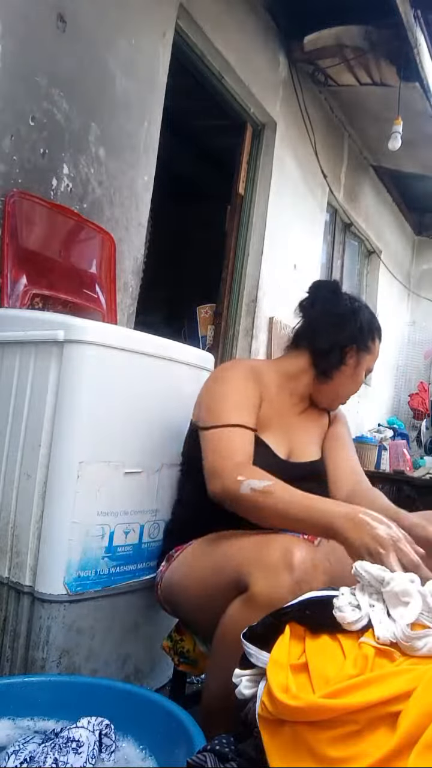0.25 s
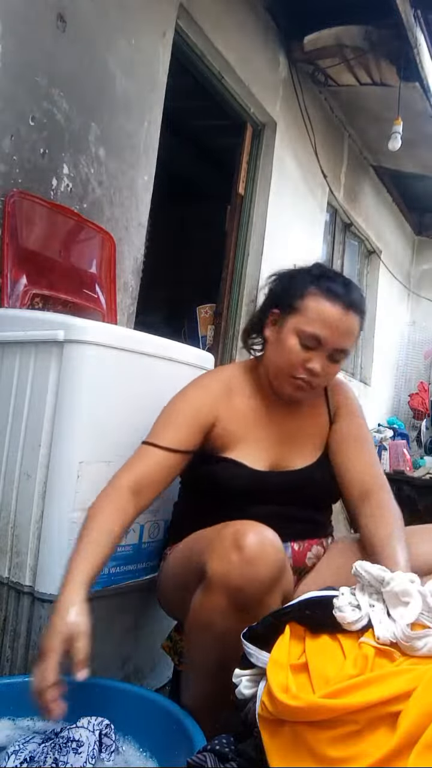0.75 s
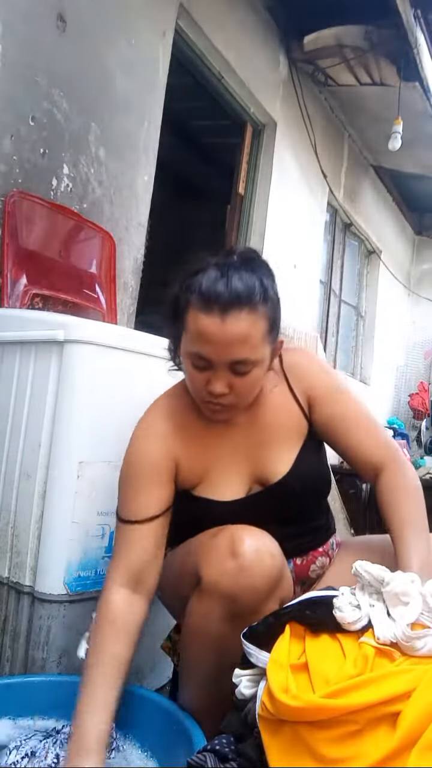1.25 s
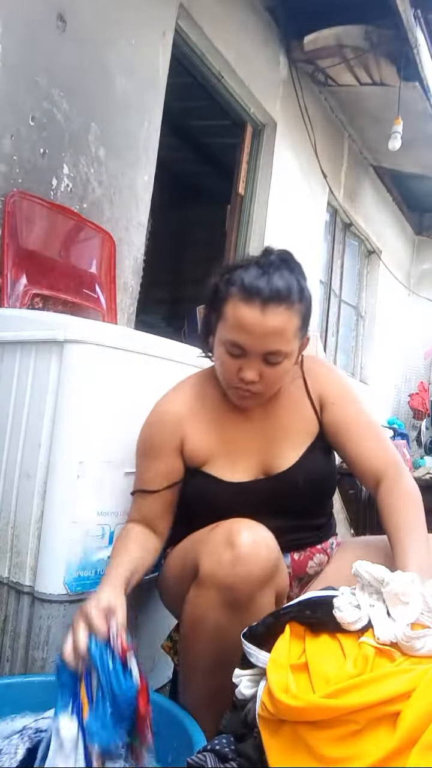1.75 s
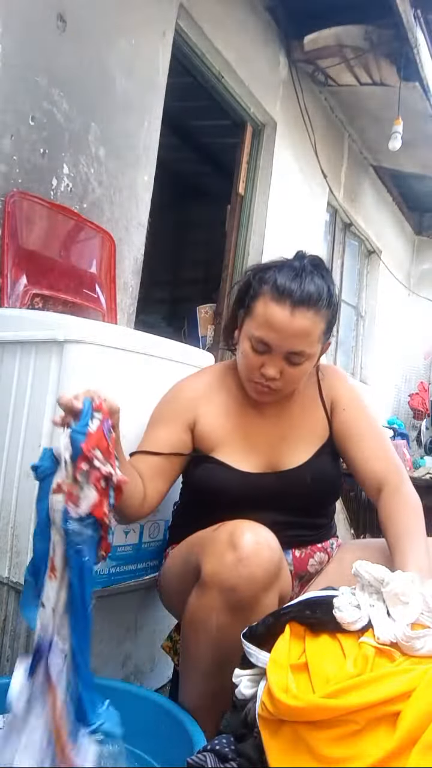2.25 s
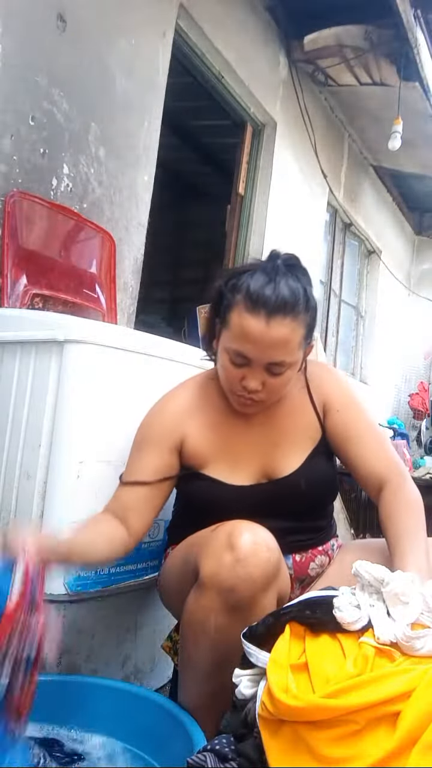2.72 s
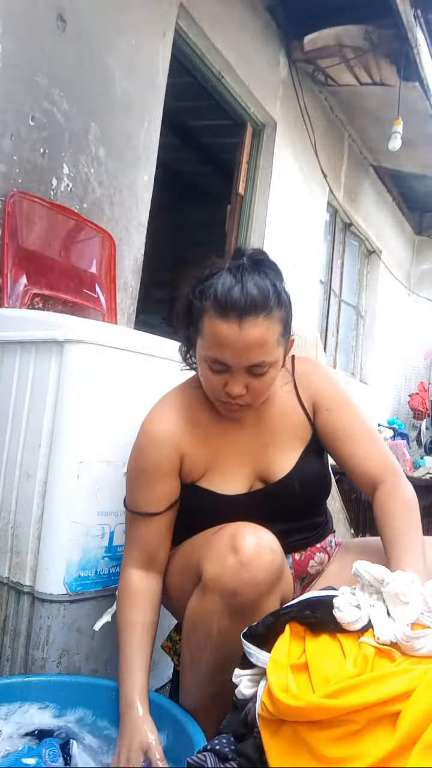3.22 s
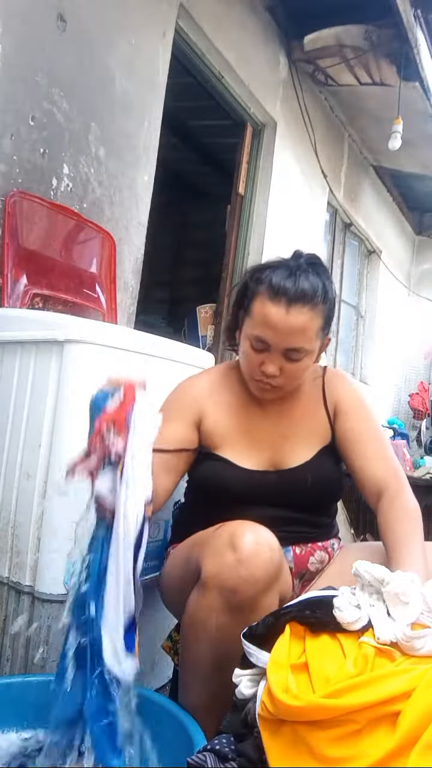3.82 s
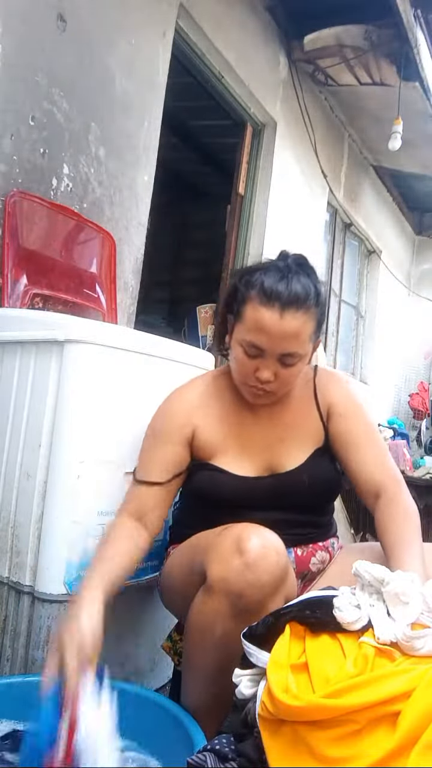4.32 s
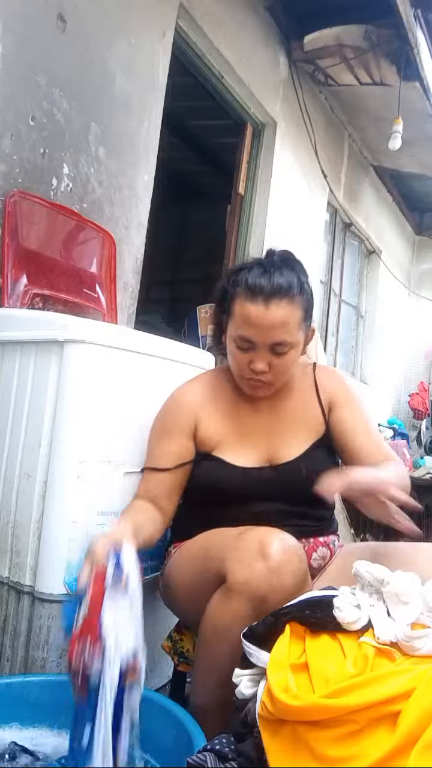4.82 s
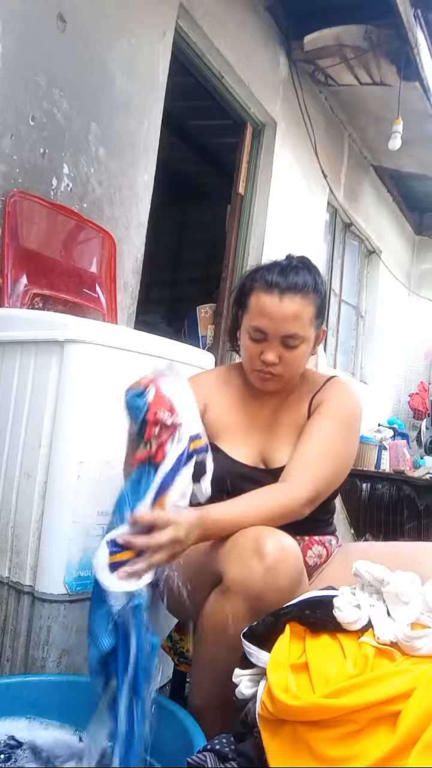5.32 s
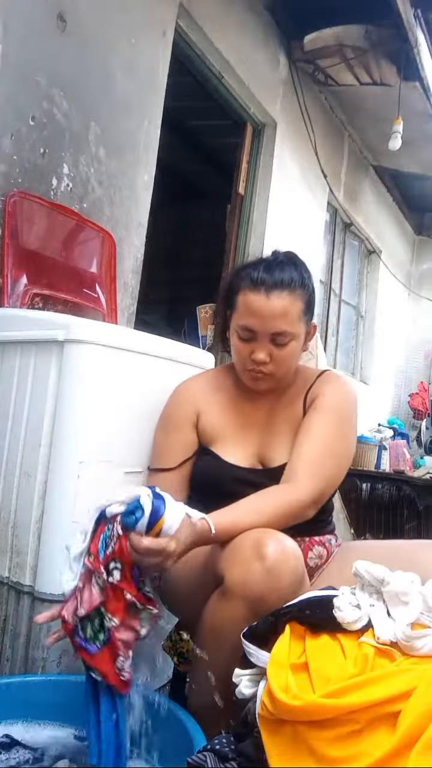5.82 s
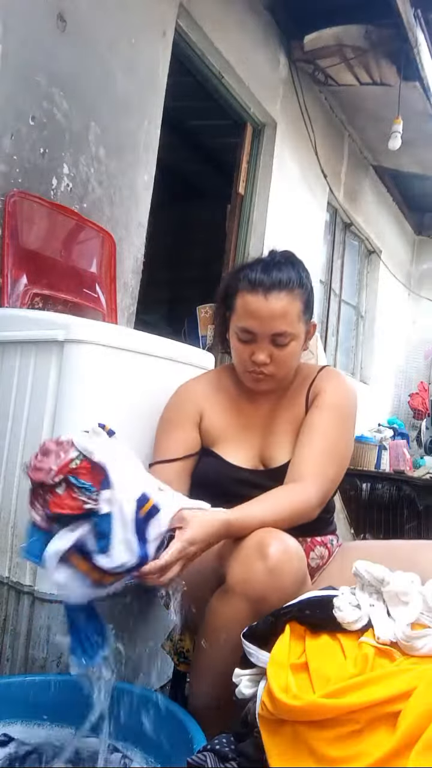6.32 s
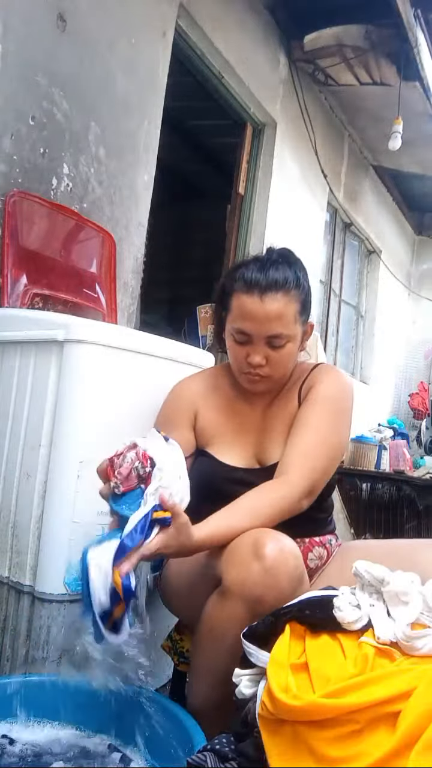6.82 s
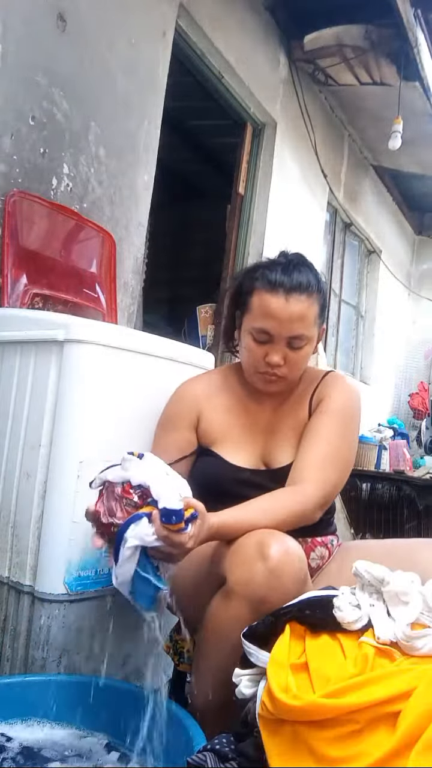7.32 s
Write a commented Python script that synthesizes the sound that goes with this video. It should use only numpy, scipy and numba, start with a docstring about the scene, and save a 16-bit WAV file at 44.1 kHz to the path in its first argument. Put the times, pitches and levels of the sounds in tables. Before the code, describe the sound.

A small yard by a house wall, heard close, with quiet low air and short reflections. At 0-0.4 s small drips and a wet, slapping flop of tossed cloth. Near-quiet follows, with a faint distant hollow drone and thin bird peeps until about 1.2 s, when a hand enters the water with a small plop. From 1.6 s soaked cloth rises, streaming and gurgling with round bubbles; splashes at 2.2 s and heavy dunking from 2.6 to 2.95 s. Around 3.0 s a dull basin knock, and a washing machine's low, steady hum begins and continues to the end. Water quietens, then a second lift from 3.4 s and brighter, forceful splashes at 4.15-4.4 s. A brief lull, then a strong hollow plastic thump at 4.7 s. From 5 s the cloth is gathered and squeezed, with uneven spurts, fizz and pattering run-off; fuller wringing showers and bubbly plops from 6.9 to 7.5 s.

```python
"""Hand washing in a plastic basin

Clothes are washed in a small yard beside a house wall: a wet garment is tossed aside, the next lifted, dunked
and wrung. Run-off is showers of decaying sines, splashes are resonant noise bursts, larger bubbles are
single gliding sines, and knocks excite the basin's modes. After three seconds a washing machine starts and
hums on, as sines over resonant noise; a bird peeps faintly in swept sines above the yard's shaped noise."""
import sys
import numpy as np
from scipy import signal
from scipy.fft import rfft, irfft
from scipy.io import wavfile
from scipy.ndimage import uniform_filter1d
from numba import njit

SR = 44100
rng = np.random.default_rng(int(sys.argv[2]) if len(sys.argv) > 2 else 0)


def materialize(psi):
    """Save the field psi as 16-bit PCM at rate SR to the path in sys.argv[1].

    A 1-D psi becomes a single channel; in a 2-D psi each row is a channel.
    """
    bounded = np.clip(np.atleast_2d(psi).T, -1, 1)
    quanta = np.round(bounded * 32767).astype(np.int16)
    wavfile.write(sys.argv[1], SR, quanta)


N = 333396

# successive movements of the cloth: [t/s, water flow level/dB, height/1 from 0 under water to 1 held high]
REACH_IN = [(.67, -95, 0.71), (.8, -84, 0.63), (.89, -77.5, 0.74), (1.08, -94, .6), (1.12, -69, 0.44),
            (1.2, -63, 0.61), (1.29, -57, 0.64), (1.38, -78.5, 0.5), (1.56, -79.5, 0.37)]
FIRST_LIFT = [(1.629, -61.5, 0.37), (1.73, -51.5, 0.34), (1.78, -46.5, 0.25), (2.02, -49.5, .35),
              (2.1, -46.5, 0.65), (2.27, -40.5, 0.43), (2.34, -48.5, 1), (2.5, -57.5, 1)]
FIRST_DUNK = [(2.548, -44, 0.88), (2.65, -40.5, 0.49), (2.72, -52, 0.78), (2.84, -37.5, 0.5),
              (2.93, -45.5, 0.32), (2.99, -66.5, 0.76)]
GRIP = [(3.05, -67.5, 0.33), (3.08, -66, 0.95), (3.17, -55.5, 0.28), (3.22, -67.5, 0.41),
        (3.36, -73.5, 0.13)]
SECOND_LIFT = [(3.44, -59, 0.28), (3.52, -57, 0.24), (3.58, -49.5, 0.1), (3.72, -47, 0.41),
               (3.89, -54.5, 0.46), (3.97, -45.5, 0.66), (4.14, -43, 0.52)]
SECOND_DUNK = [(4.2, -37, 0.46), (4.27, -40.5, 0.41), (4.35, -34, .75), (4.41, -53.5, 0.43),
               (4.5, -82, 0.14), (4.59, -70, 0.077)]
THIRD_LIFT = [(4.657, -63, 0.095), (4.681, -42.5, 0.14), (4.78, -55, .35), (4.86, -58.5, .05),
              (4.99, -57.5, 0.26), (5.09, -49, 0.48), (5.25, -57, 0.77)]
GATHER = [(5.31, -47, 0.52), (5.47, -49.5, 0.46), (5.6, -48, 0.82), (5.78, -45.5, 0.71),
          (5.95, -51.5, 0.71), (6.02, -56, 0.74), (6.22, -63, 1)]
WRING = [(6.26, -55, 1), (6.48, -51, 0.93), (6.65, -49.5, 0.72), (6.86, -58, 0.47), (6.93, -44, 0.54),
         (7.01, -48.5, 0.72), (7.16, -42, 0.57), (7.33, -48, 0.71), (7.56, -47, 0.9)]
# spectral tilt of gentle, duller run-off: [f/Hz, level/dB]
RUN_OFF = [(4500, -2.5), (6200, -2.5), (8300, -4), (11000, -1.5), (15800, -0.5)]
# at half height: level of each layer against the flow, and favoured pitch of the babble
SPRAY_DB, FIZZ_DB, GULP_DB, BABBLE_HZ = 1, -13, -9.5, 1373
# change of each layer, and of the babble's pitch, as the height goes from 0 to 1
SPRAY_LIFT_DB, FIZZ_LIFT_DB, BUBBLE_LIFT_DB, GULP_LIFT_DB, BABBLE_LIFT_OCTAVES = 14.5, 8.5, -14.5, -17, 2.5
# both hands squeeze the cloth from here on, forcing more fizz through the weave
SQUEEZE_S, SQUEEZE_FIZZ_DB = 5.05, 8.5
# above this flow, bubbles crowd each other and merge into patter: dB of trade per dB of flow
CROWDED_DB, CROWDING = -50.5, 0.58
# unevenness of the flow at half height, its change from height 0 to 1, and its rate
GUSH_DB, GUSH_LIFT_DB, GUSH_HZ = 3, 1.5, 20.6


def water():
    """Superposition of bubble and droplet sounds: low cloth traps big bubbles, high cloth rains fine spray."""
    moves = (REACH_IN + FIRST_LIFT + FIRST_DUNK + GRIP + SECOND_LIFT
             + SECOND_DUNK + THIRD_LIFT + GATHER + WRING)
    flow_db, height = curves(moves)
    lift = height - .5
    t = np.arange(N) / SR
    bubble_hz = [(s, BABBLE_HZ * 2 ** (BABBLE_LIFT_OCTAVES * (h - .5))) for s, _, h in moves]

    ticks = cloud(count=40000, low_hz=4700, high_hz=16000, cycles=9, spread_db=2.8, glide=0.)
    foam = cloud(count=13000, low_hz=4700, high_hz=8500, cycles=42, spread_db=3.0, glide=.1)
    fizz = cloud(count=8000, low_hz=2500, high_hz=4900, cycles=36, spread_db=3.2, glide=.15)
    babble = cloud(count=5200, low_hz=650, high_hz=2900, cycles=24, spread_db=3.0, glide=.32,
                   favourite=bubble_hz)
    patter = cloud(count=12000, low_hz=580, high_hz=4340, cycles=11.7, spread_db=3.5, glide=0.072)
    gulps = cloud(count=1400, low_hz=417, high_hz=798, cycles=17.7, spread_db=4.0, glide=0.27)

    droplets = colour(undb(-6.0) * ticks + undb(-4.5) * foam, RUN_OFF)
    spray = undb(SPRAY_DB + SPRAY_LIFT_DB * lift) * droplets
    crowd_db = CROWDING * np.maximum(flow_db - CROWDED_DB, 0)
    mixed = undb(-2.0 - crowd_db) * babble + undb(-8.5 + crowd_db) * patter
    bubbles = undb(BUBBLE_LIFT_DB * lift) * mixed
    fizz_db = FIZZ_DB + FIZZ_LIFT_DB * lift + SQUEEZE_FIZZ_DB * (t > SQUEEZE_S)
    gulp_db = GULP_DB + GULP_LIFT_DB * lift

    out = np.zeros(N)
    for layer in (spray, bubbles, undb(fizz_db) * fizz, undb(gulp_db) * gulps):
        # the water leaves the folds in uneven gushes, separate for each layer
        gush_db = (GUSH_DB + GUSH_LIFT_DB * lift) * wander(GUSH_HZ)
        out += undb(flow_db + gush_db) * layer
    return (t > moves[0][0]) * out


# soaked cloth slaps down:
# [t/s at the crest, rise/s, decay/s, plunge level/dB, plunge f/Hz, spray level/dB, extra mist level/dB]
SLAPS = [(0.261, 0.018, 0.031, -42.5, 1920, -47, -16), (.298, 0.0085, .026, -33, 1800, -43.5, -12),
         (.316, 0.0047, 0.018, -37.5, 2390, -45, -13), (1.288, 0.0085, 0.0061, -55, 690, -51, -4),
         (1.762, 0.014, 0.027, -39, 840, -61, -3), (2.189, 0.015, 0.013, -37.5, 1340, -47.5, -16),
         (2.28, 0.0035, 0.015, -42.5, 540, -38, -23), (2.652, 0.029, 0.02, -34.5, 1190, -34, -4),
         (2.843, 0.017, 0.019, -31, 1240, -37, 8.5), (2.92, 0.0012, .01, -39, 1360, -44, -4),
         (4.162, 0.011, 0.017, -54, 1610, -46.5, 8), (4.198, 0.0044, 0.01, -36, 1890, -32.5, -13),
         (4.303, 0.021, 0.02, -35, 780, -37, 5), (4.344, 0.0041, 0.02, -32.5, 700, -35, -3.5),
         (4.676, 0.0068, 0.039, -39.5, 1210, -55, -9), (7.304, 0.0033, 0.063, -43, 2600, -43.5, -1)]
# water spurts from the folds or flicks off the hand: [t/s, spray level/dB, plunge level/dB, decay/s]
SPURTS = [(.006, -36, -79, 0.0059), (0.072, -48, -91, 0.022), (0.102, -50, -90, 0.012),
          (.165, -69.5, -91, .03), (0.67, -75, -88, .003), (1.12, -63.5, -77.5, 0.063),
          (2.095, -60, -36.5, 0.0037), (2.468, -42.5, -44.5, 0.011), (2.174, -35, -38, 0.0096),
          (2.609, -38, -38, 0.056), (2.692, -32.5, -45, 0.0025), (2.739, -37, -55, 0.0034),
          (3.94, -50, -41.5, 0.0043), (4.24, -36, -42, 0.0066), (5.313, -46, -45, 0.0096),
          (5.524, -54, -34, 0.01), (5.679, -38.5, -64, 0.014), (5.752, -42.5, -43, 0.025),
          (5.849, -52, -40, 0.0068), (6.254, -53, -57, 0.012), (6.361, -40.5, -50, 0.016),
          (6.546, -49, -49, 0.0035), (6.577, -39.5, -70, 0.024), (6.694, -46.5, -67, 0.017),
          (6.919, -38, -43, 0.029), (7.089, -41, -44, 0.0057), (7.362, -38, -43, 0.012)]
SPURT_RISE_S, SPURT_HZ, SPURT_MIST_DB = .0026, 3270, -1.5
# each single large bubble is born in a short plop, its level relative to the bubble
PLOP_DB, PLOP_RISE_S, PLOP_DECAY_S = -16, 0.0042, 0.02
# hard impacts throw finer, brighter spray: [f/Hz, level/dB]
FINE_SPRAY = [(3000, 10.5), (6000, -2), (8500, 6.5), (15000, 4)]
# the finest mist lies above this pitch
MIST_HZ = 7800


def splashes():
    """Impact and cavity resonance: cloth or water plunges with a broad resonance and throws a burst of spray."""
    t, out = np.arange(N) / SR, np.zeros(N)
    churn = cloud(count=24000, low_hz=360, high_hz=4700, cycles=2.75, spread_db=-0.5, glide=0.05)
    droplets = cloud(count=70000, low_hz=4000, high_hz=16000, cycles=8, spread_db=1.5, glide=0.)
    spray = colour(droplets, FINE_SPRAY)
    mist = signal.sosfiltfilt(signal.butter(6, MIST_HZ, "high", fs=SR, output="sos"), spray)

    spurts = [(s, SPURT_RISE_S, decay, plunge_db, SPURT_HZ, spray_db, SPURT_MIST_DB)
              for s, spray_db, plunge_db, decay in SPURTS]
    # plops throw no spray
    plops = [(s, PLOP_RISE_S, PLOP_DECAY_S, db + PLOP_DB, hz, -np.inf, 0) for s, hz, db in BUBBLES]
    for s, rise, decay, plunge_db, plunge_hz, spray_db, mist_db in SLAPS + spurts + plops:
        span = slice(max(int((s - 3 * rise) * SR), 0), int((s + 7 * decay) * SR))
        age = t[span] - s
        # Gaussian rise, exponential decay
        swell = np.exp(-np.where(age < 0, (age / rise) ** 2, age / decay))
        plunge = unit(resonate(churn[span], plunge_hz, 1.11 * plunge_hz))
        thrown = spray[span] + (undb(mist_db) - 1) * mist[span]
        out[span] += swell * (undb(plunge_db) * plunge + undb(spray_db) * thrown)
    return out


# single large bubbles: [t/s, f/Hz, peak level/dB]
BUBBLES = [(0.046, 5830, -44), (.1, 3420, -74), (.101, 8500, -43), (1.229, 3120, -37), (1.33, 1550, -52),
           (1.387, 1610, -53.5), (1.48, 3300, -61), (1.631, 1610, -42), (1.767, 627, -29),
           (1.881, 660, -28.5), (1.911, 740, -36), (1.967, 1110, -28.5), (2.068, 3990, -32.5),
           (2.07, 1150, -29), (2.094, 2320, -28.5), (2.273, 470, -40), (2.572, 2040, -31),
           (2.641, 1170, -28.5), (2.84, 860, -19), (2.918, 5780, -24), (2.967, 354, -35),
           (3.072, 1155, -31.5), (3.13, 3490, -41), (3.18, 6530, -44.5), (3.21, 4570, -49),
           (3.507, 1220, -38), (3.57, 1180, -35), (3.648, 1720, -32.5), (3.849, 1430, -35.5),
           (4.025, 1210, -32), (4.154, 1580, -24.5), (4.239, 6080, -20), (4.342, 5750, -19.5),
           (4.865, 1320, -37.5), (4.976, 1650, -33), (5.64, 4000, -37), (5.781, 1570, -30),
           (6.249, 6070, -30.5), (6.545, 3150, -40), (6.692, 6610, -29), (6.742, 1264, -27),
           (6.745, 3300, -35.5), (7.069, 920, -35), (7.088, 5380, -22), (7.152, 810, -27.5),
           (7.301, 2240, -26.5)]
# runs of bubbles as a pocket of air empties: [t/s, length/s, first f/Hz, last f/Hz, bubble peak level/dB]
GURGLES = [(1.884, 0.081, 715, 630, -37), (2.101, 0.046, 2290, 1530, -36.5),
           (3.069, 0.038, 1156, 1200, -40.5), (3.127, .04, 1700, 1730, -41),
           (3.396, 0.036, 1460, 1790, -41.5), (3.601, 0.067, 1220, 1600, -50),
           (4.916, .11, 1086, 1520, -42), (7.054, 0.028, 1030, 870, -36.5), (7.144, 0.073, 837, 2230, -35)]
# bubbles in a run: how many a second, scatter of pitch and of level
GURGLE_RATE, GURGLE_SCATTER_OCTAVES, GURGLE_SCATTER_DB = 200, 0.15, 1.5
# small bubbles ring for more cycles: cycles at 1 kHz, and the power of pitch by which they grow
BUBBLE_CYCLES, CYCLES_POWER = 27.3, 0.72
# bubbles rise in pitch by this share as they surface
BUBBLE_GLIDE = 0.18


def large_bubbles():
    """Volume resonance of trapped air: pockets escape the folds and ring, singly or in gurgling runs."""
    bubbles = list(BUBBLES)
    for s, length, first_hz, last_hz, db in GURGLES:
        count = int(np.clip(length * GURGLE_RATE, 2, 30))
        jitter, detune, accent = rng.standard_normal((30, 3))[:count].T
        along = np.abs(np.arange(count) + .3 * jitter) / count
        path_hz = first_hz * (last_hz / first_hz) ** along
        hz = path_hz * 2 ** (GURGLE_SCATTER_OCTAVES * detune)
        bubbles += zip(s + length * along, hz, db + GURGLE_SCATTER_DB * accent)
    s, hz, db = np.array(bubbles, float).T.copy()
    cycles = BUBBLE_CYCLES * (hz / 1000) ** CYCLES_POWER
    return ring(s, hz, cycles, undb(db), BUBBLE_GLIDE)


# knocks on the water-filled basin: [t/s, level/dB, contact time/s]
KNOCKS = [(1.291, -63.5, 0.0016), (2.649, -53, 0.0011), (2.728, -52, 0.00072), (2.806, -53, 0.0016),
          (2.846, -48.5, 0.0012), (2.988, -45.5, 0.00074), (3.012, -36.5, 0.0044), (4.343, -47.5, 0.0013),
          (4.672, -25, 0.0017), (4.688, -40, 0.00063), (4.708, -27, 0.0022)]
# the basin's modes: [f/Hz, level/dB, t60/s]
BASIN = [(149.2, -4, 0.72), (199, 9, 0.086), (263.4, 0.5, 0.36), (285, -5.5, 0.41), (331, 1.5, 0.08),
         (365, -8, 0.32), (406.8, 1, 0.38), (506.5, -10, 0.19), (642, -12, 0.12), (780, -14, 0.19),
         (1008, -0.5, 0.11)]


def basin():
    """Modal excitation: cloth and hand push the plastic wall; a longer contact gives a duller knock."""
    force, t = np.zeros(N), np.arange(SR // 2) / SR
    for s, db, contact in KNOCKS:
        push = np.exp(-((np.arange(N) / SR - s) / (contact / 4)) ** 2)
        force += undb(db) * push / push.sum()
    body = np.zeros(len(t))
    for hz, db, t60 in BASIN:
        fade = np.exp(-np.log(1000) * t / t60)
        body += undb(db) * np.sin(2 * np.pi * hz * t) * fade
    knocks = signal.fftconvolve(force, body)[:N]
    # the wall is too small to radiate deep bass
    return signal.sosfilt(signal.butter(3, 110, "high", fs=SR, output="sos"), knocks)


# hum partials: [multiple of twice the mains rate/1, level/dB]
HUM = [(1, 0.5), (2, -23), (3, -40)]
# resonances of the cabinet shaken by the drum: [f/Hz, width of one filter pass/Hz, level/dB]
CABINET = [(51.6, 7.3, -13.5), (86.7, 14.3, 0.5), (119.5, 16.4, 2.5), (137, 67, -11.5), (169.5, 18.8, -1),
           (197.8, 10, -11), (243, 114, -13.5), (369, 340, -23)]
MOTOR_ON_S, MOTOR_RISE_S, HUM_HZ = 3.03, 0.033, 119.1
# base level of the hum, and how much and how fast it wavers
HUM_DB, WAVER_DB, WAVER_HZ = -28, 0.7, 1.2


def machine():
    """Harmonic and forced vibration: the motor hums at twice the mains rate; the drum shakes the cabinet."""
    t = np.arange(N) / SR
    running = np.clip((t - MOTOR_ON_S) / MOTOR_RISE_S, 0, 1)
    hum = sum(undb(db) * np.sin(2 * np.pi * k * HUM_HZ * t) for k, db in HUM)
    hum_gain = undb(HUM_DB + WAVER_DB * wander(WAVER_HZ))
    shaking = sum(undb(db) * resonate(rng.standard_normal(N), hz, width) for hz, width, db in CABINET)
    return running * (hum_gain * hum + undb(-45.0) * unit(shaking))


# bird peeps: [t/s, length/s, start f/Hz, end f/Hz, level/dB]
PEEPS = [(0.158, 0.015, 3550, 3850, -70), (0.759, 0.04, 3460, 3380, -80), (0.99, 0.18, 3640, 3330, -73)]


def bird():
    """Frequency modulation: thin, slightly wavering peeps glide in pitch under a half-sine envelope."""
    t, out = np.arange(N) / SR, np.zeros(N)
    waver = unit(resonate(rng.standard_normal(N), 45, 60.8))
    for s, length, start_hz, end_hz, db in PEEPS:
        along = np.clip((t - s) / length, 0, 1)
        hz = (start_hz + (end_hz - start_hz) * along) * (1 + .012 * waver)
        out += undb(db) * np.sin(np.pi * along) * np.sin(2 * np.pi * np.cumsum(hz) / SR)
    return out


# spectrum of the quiet yard: [f/Hz, level per Hz/dB]
YARD = [(18, -56.5), (30, -27.5), (75, -9.5), (98, -8), (120, -5.5), (141, -20.5), (209, -15), (251, -23.5),
        (435, -24), (596, -26), (680, -34), (1490, -38), (3640, -44), (15800, -37)]
# its level before the treble is softened
YARD_DB = -68.5
# a faint far-off drone swells: [t/s at the crest, half length/s, level/dB]
DRONE_SWELLS = [(0.06, 0.35, -74), (0.404, 0.061, -67.5), (0.902, 0.082, -66), (1.42, 0.22, -70.5)]
# the hollow sound of the drone: centre and width of one filter pass
DRONE_HZ, DRONE_WIDTH_HZ = 590, 130


def yard():
    """Filtered noise: still air with a low rumble, and a faint hollow resonance that comes and goes."""
    t = np.arange(N) / SR
    swells = sum(undb(db) * np.exp(-((t - s) / half) ** 2) for s, half, db in DRONE_SWELLS)
    drone = swells * unit(resonate(rng.standard_normal(N), DRONE_HZ, DRONE_WIDTH_HZ))
    air = unit(colour(rng.standard_normal(N), YARD))
    # distance takes the edge off the hiss
    soft_air = signal.sosfilt(signal.butter(1, 9000, fs=SR, output="sos"), air)
    return drone + undb(YARD_DB) * soft_air


def walls(x, near_db, near_t60, far_db, far_t60, count=9):
    """Time-varying reverberation: quick reflections and a short tail change as the water moves about."""
    t, out = np.arange(SR // 2) / SR, x
    eaves = signal.butter(2, 7000, fs=SR, output="sos")

    def reflections(t60, lag):
        """Diffuse reflection: noise decays exponentially after a first lag."""
        tail = rng.standard_normal(len(t)) * np.exp(-np.log(1000) * t / t60) * (t > lag)
        return unit(tail) / np.sqrt(len(t))

    for k in range(count):
        near = reflections(near_t60, .001)
        far = signal.sosfilt(eaves, reflections(far_t60, .008))
        # each spot in the basin takes its turn, 14 a second, and hands over to the next
        turn = (np.arange(N) / SR * 14 - k) % count
        share = np.sin(np.pi * np.minimum(turn, 2) / 2)
        out = out + signal.fftconvolve(x * share, undb(near_db) * near + undb(far_db) * far)[:N]
    return out


# colour of splashing water: [f/Hz, level per Hz/dB]
WATER_COLOUR = [(150, -32.5), (250, 8), (313, -8), (348, -8.5), (575, -14.5), (842, -12), (1000, -13),
                (1190, -9.5), (3040, -11.5), (5210, -6), (6190, -1), (7760, -15.5), (8320, -15),
                (9890, -22), (15800, -29.5)]


def cloud(count, low_hz, high_hz, cycles, spread_db, glide, favourite=None):
    """Granular superposition: a steady shower of grains of random level, in the colour of water."""
    when, pitch, life, strength = rng.random((count, 4)).T
    s = when * N / SR
    hz = low_hz * (min(high_hz, SR / 2.6) / low_hz) ** pitch
    turns = cycles * 2 ** (2 * life - 1)
    size = undb(-spread_db * np.log(strength + 0.0088)) * hz / np.sqrt(turns)
    if favourite is not None:
        # each movement traps bubbles of about one size
        octaves = np.log2(hz / np.interp(s, *np.transpose(favourite)))
        size = size / (1 + (octaves / 0.9) ** 2)
    x = colour(ring(s, hz, turns, size, glide), WATER_COLOUR)
    # small bubbles radiate almost nothing below their own pitch
    x = signal.sosfilt(signal.butter(4, low_hz, "high", fs=SR, output="sos"), x)
    # the flow is shared out among the grains of each moment
    power = uniform_filter1d(uniform_filter1d(x ** 2, size=2000), size=1000)
    return x / np.sqrt(power + 1e-6 * np.mean(x ** 2))


@njit
def ring(start, hz, cycles, size, glide):
    """Damped oscillation: sines swell as the neck pinches off, fade, and glide up near the surface."""
    out = np.zeros(N)
    for k in range(len(start)):
        first, length = int(start[k] * SR), int(cycles[k] / hz[k] * SR) + 2
        # the fade reaches -60 dB at the end of the grain
        phase, level, fade = 0., 1.5 * size[k], np.exp(-6.9 / length)
        for i in range(min(length, N - first)):
            phase += 2 * np.pi * hz[k] * (1 + glide * i / length) / SR
            level *= fade
            swell = min(9 * i / length, 1.)
            out[first + i] += level * np.sin(phase) * swell * (2 - swell)
    return out


def resonate(x, hz, width_hz):
    """Second-order resonance applied twice, gain 1 at its centre."""
    b, a = signal.iirpeak(hz, hz / width_hz, fs=SR)
    return signal.lfilter(b, a, signal.lfilter(b, a, x))


def colour(x, points):
    """Minimum-phase filtering: a causal filter through (Hz, dB) points, built from the folded cepstrum."""
    hz, db = np.transpose(points)
    grid_hz = np.fft.rfftfreq(4096, 1 / SR) + 1
    log_gain = np.log(undb(np.interp(np.log(grid_hz), np.log(hz), db)))
    cepstrum = irfft(log_gain)[:2048] * np.r_[1, np.full(2047, 2)]
    response = irfft(np.exp(rfft(cepstrum, 4096)))
    return signal.fftconvolve(x, response)[:len(x)]


def wander(hz):
    """Low-passed noise: slow chance with spread 1, changing at up to about the given rate."""
    return unit(signal.sosfilt(signal.butter(2, hz, fs=SR, output="sos"), rng.standard_normal(N)))


def curves(table):
    """Linear interpolation: each column of a timed table, joined by straight lines."""
    s, *columns = np.transpose(table)
    return [np.interp(np.arange(N) / SR, s, c) for c in columns]


def undb(db):
    """Logarithmic level: decibels to amplitude gain."""
    return 10 ** (np.asarray(db) / 20)


def unit(x):
    """Power normalisation: scale to rms 1."""
    return x / np.sqrt(np.mean(x ** 2))


def scene():
    """Linear superposition: washing and bird among the walls, then basin, machine and quiet yard."""
    washing = water() + splashes() + large_bubbles()
    reflected = walls(washing + bird(), near_db=-4.5, near_t60=0.024, far_db=-10.5, far_t60=0.12)
    return (reflected + basin() + machine() + yard())[None]


def record(dry):
    """Band limitation: the deep bass is thinned below 40 Hz and the top cut steeply at 15.8 kHz."""
    thin = signal.sosfilt(signal.butter(2, 40, "high", fs=SR, output="sos"), dry)
    return signal.sosfilt(signal.ellip(10, .1, 80, 15800, fs=SR, output="sos"), thin)


dry = scene()
out = record(dry)
materialize(out)
```